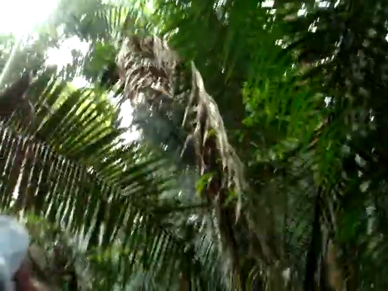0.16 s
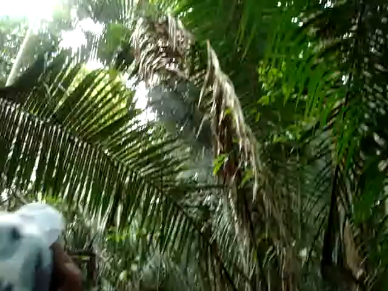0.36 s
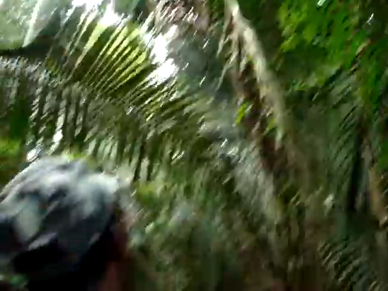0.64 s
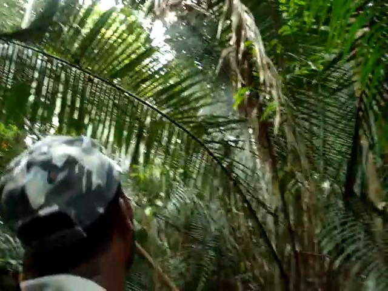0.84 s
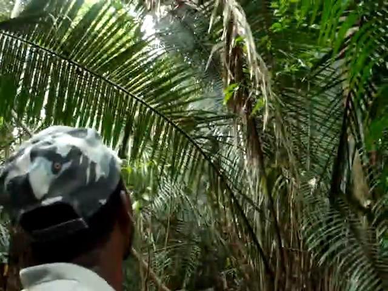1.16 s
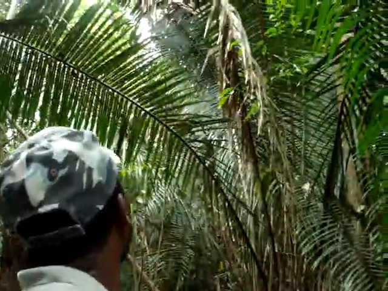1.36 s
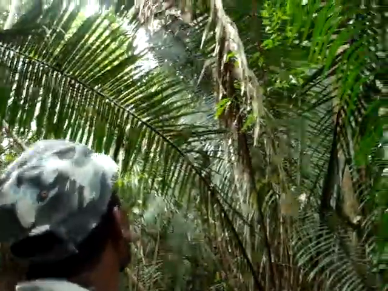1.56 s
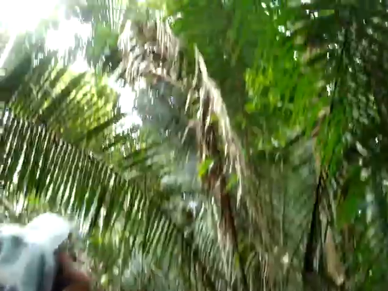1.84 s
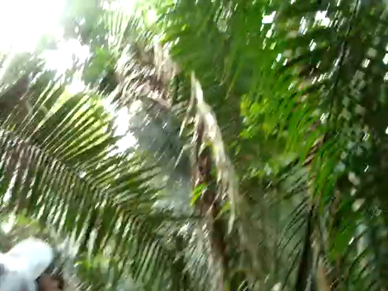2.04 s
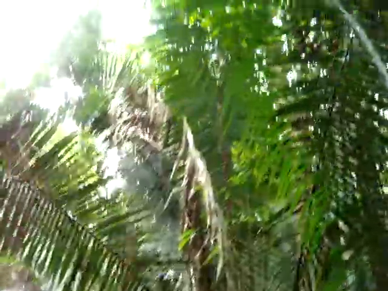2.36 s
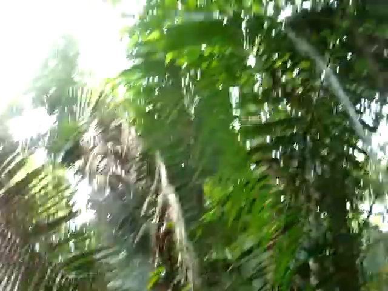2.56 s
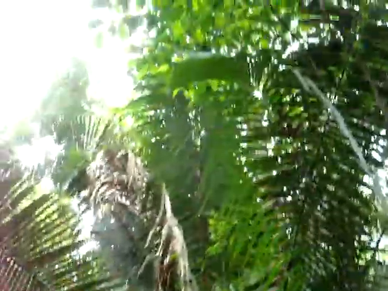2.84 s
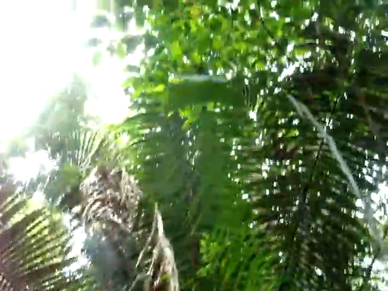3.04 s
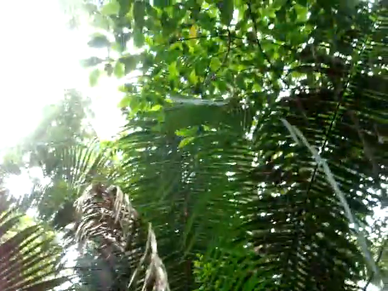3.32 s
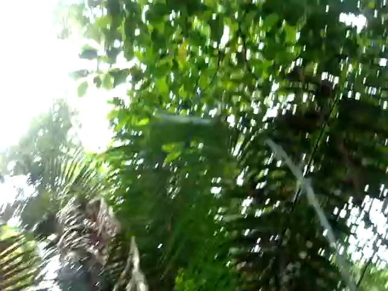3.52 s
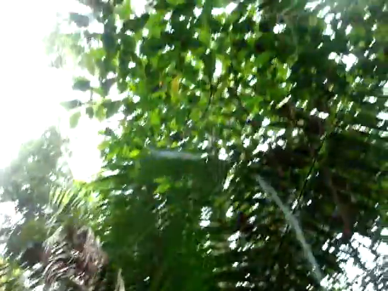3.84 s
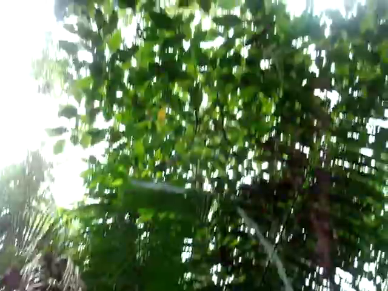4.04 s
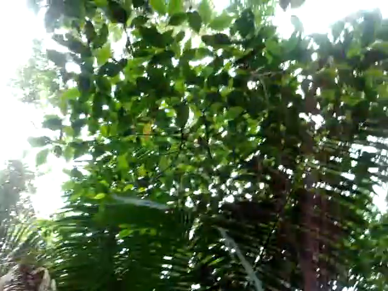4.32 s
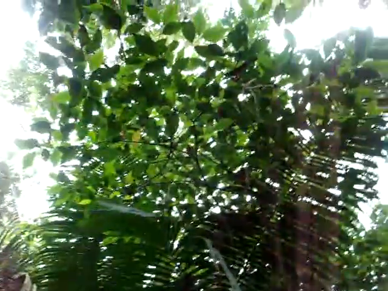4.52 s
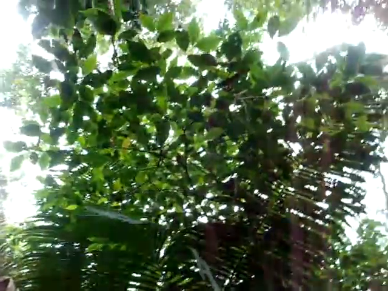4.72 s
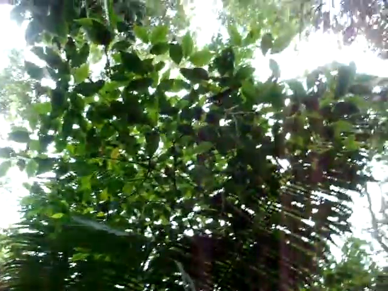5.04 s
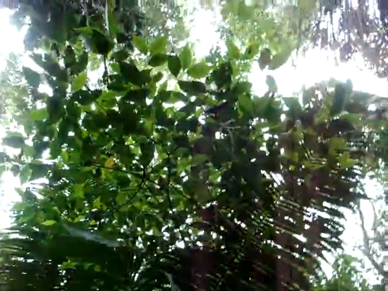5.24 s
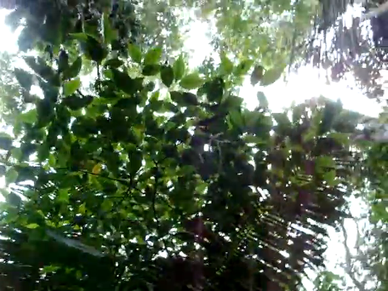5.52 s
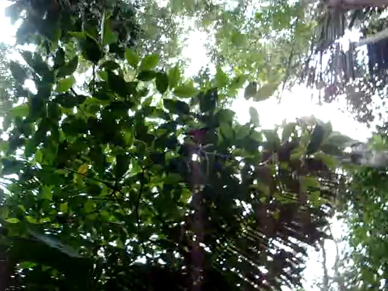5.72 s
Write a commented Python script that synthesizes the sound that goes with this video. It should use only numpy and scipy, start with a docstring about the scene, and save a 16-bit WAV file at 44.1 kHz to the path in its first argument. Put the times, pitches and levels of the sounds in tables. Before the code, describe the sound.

Howler monkeys in a jungle: quiet whistles and dry leaf snaps, then deep grunts, hooting and a swelling raspy roar with loud twig cracks.

```python
"""Howler monkeys in the canopy: a grunt dies away, a bird whistles and dry leaves crackle underfoot,
then grunts, indrawn moans and clear hoots build into a long hoarse roar, over forest hush and soft knocks.
Breath noise rings throat resonances for grunts and roar; hoots, moans and whistles are gliding tones.
Leaves are crackling noise with sharp snaps; sparse random taps give the forest's diffuse echo."""
import sys
import numpy as np
from scipy import signal
from scipy.fft import rfft, irfft
from scipy.io import wavfile

SR = 44100
rng = np.random.default_rng(int(sys.argv[2]) if len(sys.argv) > 2 else 0)


def gain_from_decibels(decibels):
    """Convert decibel values to linear amplitude factors."""
    exponent = np.asarray(decibels, float) / 20
    return 10 ** exponent


def unload_wav(signal):
    """Save mono or channel-first audio to the path in sys.argv[1] as 16-bit WAV at rate SR, clipped to [-1, 1]."""
    wavfile.write(
        sys.argv[1],
        SR,
        np.round(np.clip(np.atleast_2d(signal).T, -1, 1) * 32767).astype(np.int16),
    )


N = 259370


def evened(x):
    """Scales to rms 1."""
    return x / np.sqrt(np.mean(x ** 2) + 1e-20)


def add(mix, start_s, sound):
    """Mixes a sound in at start_s."""
    part = mix[round(start_s * SR):][:len(sound)]
    part += sound[:len(part)]


def layer(events):
    """Sums (start s, sound) events into one layer."""
    out = np.zeros(N)
    for start_s, sound in events:
        add(out, start_s, sound)
    return out


def columns(rows):
    """Reads a curve table at every sample; returns start time and columns."""
    times_s, *cols = np.transpose(rows)
    t = np.arange(times_s[0], times_s[-1], 1 / SR)
    return times_s[0], [np.interp(t, times_s, c) for c in cols]


def wander(count, rate_hz):
    """Slow random wobble of rms 1: lowpassed noise, settled over 4000 samples."""
    b, a = signal.butter(2, rate_hz, fs=SR)
    return evened(signal.lfilter(b, a, rng.standard_normal(count + 4000))[4000:])


def phase_of(hz):
    """Phase [rad] of a tone of varying frequency."""
    return 2 * np.pi * np.cumsum(hz) / SR


def coloured(points):
    """Noise with the given spectrum, rms 1; levels interpolate over log frequency."""
    hz = np.fft.rfftfreq(N, 1 / SR)
    f, db = np.transpose(points)
    gain = gain_from_decibels(np.interp(np.log(hz + 1), np.log(f + 1), db))
    return evened(irfft(rfft(rng.standard_normal(N)) * gain, N))


def resonate(x, hz, width_hz):
    """Resonance: shifts hz down to zero, smooths twice for steep skirts, shifts back."""
    turn = np.exp(1j * phase_of(hz * np.ones(len(x))))
    r = np.exp(-np.pi * width_hz / SR)
    low = signal.lfilter([1 - r], [1, -r], x / turn)
    low = signal.lfilter([1 - r], [1, -r], low)
    return 2 * (turn * low).real


def through(x, modes, shift=1, waver_db=0):
    """Sum of resonances of alternating sign, each wavering in level and drifting on its own; rms 1."""
    total = 0
    for k, (hz, width_hz, db) in enumerate(modes):
        gain = (-1) ** k * gain_from_decibels(db + waver_db * wander(len(x), 4.2))
        drifting_hz = hz * shift * (1 + .004 * wander(len(x), 3))
        total = total + gain * resonate(x, drifting_hz, width_hz)
    return evened(total)


def roar(effort_db, throat, upper_db, lowest_db, shift=1):
    """Lumpy breath noise, for chaotically flapping folds, rings low, middle and upper throat chambers."""
    breath = rng.standard_normal(len(effort_db)) * gain_from_decibels(1.5 * wander(len(effort_db), 70))
    low, middle, high = (through(breath, modes, by, waver_db=1.2)
                         for modes, by in zip(throat, (1, 1, shift)))
    # air rushing past the teeth
    hiss = evened(signal.lfilter(*signal.butter(2, 4400, "high", fs=SR), breath))
    # the lowest chambers weaken against the middle as effort grows; lowest_db holds at -20 dB
    low_gain = gain_from_decibels(lowest_db - .25 * (effort_db + 20))
    return gain_from_decibels(effort_db) * (middle + gain_from_decibels(upper_db) * high + low_gain * low + gain_from_decibels(-27) * hiss)


def grunt(start_s, effort_db, rise_s, hold_s, fall_s, upper_db):
    """One push of breath: a swelling rise, a hold, a fall and a weak trail."""
    # chambers, low, middle and upper group: (centre [Hz], width [Hz], relative level [dB])
    chambers = ([(341, 100, -7), (491.7, 58.5, 1.5)], [(699, 211, -4), (1165, 253, -4), (1628, 295, -7),
                (2040, 470, -14.5), (2436, 83, -15.5), (2644, 156, -18.5)], [(3210, 194, 8.5),
                (3670, 480, -6.5), (4280, 430, -5), (4880, 480, -13), (5420, 200, -12)])
    t = np.arange(0, .7, 1 / SR)
    after_s = np.maximum(t - rise_s - hold_s, 0)
    rise_db = 36 * np.log10(np.clip(t / rise_s, .01, 1))
    trail_db = -12.5 - 49 * after_s
    fall_db = np.maximum(-20 * after_s / fall_s, trail_db)
    shape_db = rise_db + fall_db
    return start_s, roar(effort_db + shape_db, chambers, upper_db - .1 * shape_db, -11.5)


def grunts():
    """Short hoarse grunts, each one push of breath."""
    # (start [s], effort [dB], rise [s], hold [s], time to fall 20 dB [s],
    #  upper throat against middle at full push [dB])
    rows = [(0, -18.5, .004, .045, .11, -13.5), (2.384, -22.5, .066, .016, .065, -19.5),
            (2.964, -21.5, .072, .022, .125, -17.5), (3.218, -21, .072, .032, .165, -17.5),
            (3.412, -21, .178, .006, .125, -17.5), (3.852, -19.5, .058, .115, .075, -18.5)]
    return layer(grunt(*row) for row in rows)


def hush():
    """Forest hush: steady coloured noise."""
    # spectrum: (frequency [Hz], relative density [dB per Hz])
    spectrum = [(20, -31.5), (100, -19), (220, -8), (400, -4), (1300, -3.5), (2500, -12), (5000, -13),
                (10000, -24.5)]
    return gain_from_decibels(-48.5) * coloured(spectrum)


def rustle():
    """Leaf noise in tiny crackles of uneven size; each step stirs it up and it settles again."""
    # spectrum: (frequency [Hz], relative density [dB per Hz])
    spectrum = [(59, -49.5), (100, -30.5), (575, -19), (1110, -19), (1290, -11.5), (1890, -16.5),
                (2380, -9), (9890, -19.5), (12900, -50.5), (21800, -120)]
    # leaves trodden and brushed: (start [s], level [dB], rise [s], hold [s])
    steps = [(0.264, -40.5, 0.018, 0.013), (0.598, -44.5, 0.05, 0.065), (0.847, -44, 0.088, 0.21),
             (1.473, -42.5, 0.025, 0.084), (2.061, -42.5, 0.013, 0.012), (2.4, -52.5, 0.043, 0.078),
             (2.937, -41.5, 0.25, 0.057), (3.46, -46, 0.045, 0.54), (4.71, -39.5, 0.014, 0.0059),
             (4.83, -33, 0.011, 0.013)]
    rest_db, settle_db_per_s = -54, 71
    t, power = np.arange(N) / SR, gain_from_decibels(rest_db) ** 2
    for start_s, db, rise_s, hold_s in steps:
        settle_db = settle_db_per_s * np.maximum(t - start_s - rise_s - hold_s, 0)
        power = power + (np.clip((t - start_s) / rise_s, 0, 1) * gain_from_decibels(db - settle_db)) ** 2
    crackle = gain_from_decibels(2.4 * wander(N, 70))
    return np.sqrt(power) * evened(coloured(spectrum) * crackle)


def moan(start_s, length_s, first_hz, last_hz, level_db, mouth_db):
    """An unsteady low tone; noise puffs at the same jittery pitch ring the mouth."""
    # mouth resonances: (centre [Hz], width [Hz], relative level [dB])
    mouth = [(415, 39, 1), (638, 250, -4.5), (877, 106, 2.5), (1477, 144, 1), (1903, 89, -4),
             (2670, 260, -20.5), (3130, 51, -14.5)]
    t = np.arange(0, length_s, 1 / SR)
    hz = first_hz + (last_hz - first_hz) * t / length_s
    cycles = np.cumsum(hz * (1 + .012 * wander(len(hz), 40))) / SR
    tone = np.sqrt(2) * np.sin(2 * np.pi * cycles) * gain_from_decibels(3.1 * wander(len(hz), 44))
    puffs = (1.2 + np.exp(-(cycles % 1) / .84)) * rng.standard_normal(len(hz))
    voice = gain_from_decibels(level_db) * tone + gain_from_decibels(mouth_db) * through(puffs, mouth)
    rise_s, fall_s = .028, .035
    return start_s, voice * np.minimum(np.minimum(t / rise_s, (length_s - t) / fall_s), 1)


def moans():
    """Indrawn moans, one row a note."""
    # (start [s], length [s], first pitch [Hz], last pitch [Hz], fundamental [dB], mouth resonances [dB])
    rows = [(0.152, .2, 347.4, 317.4, -44.5, -46), (2.19, 0.094, 261, 246, -43.5, -43.5),
            (2.575, 0.19, 298.6, 335, -35, -33.5), (2.681, 0.12, 414, 396, -38.5, -28.5),
            (2.772, 0.15, 335, 349, -34, -37.5), (2.898, 0.071, 399, 411, -34.5, -43.5),
            (4.152, 0.21, 379.6, 370.4, -46, -48), (4.923, .26, 385, 348.7, -31, -38),
            (5.784, 0.11, 308, 327, -36, -39)]
    return layer(moan(*row) for row in rows)


def whistle(start_s, length_s, first_hz, last_hz, glide_s, level_db):
    """A near sine that glides to its note, swelling, then fades; a falling glide sets in gently."""
    t = np.arange(0, length_s, 1 / SR)
    u = np.minimum(t / glide_s, 1)
    bend = 2 if last_hz < first_hz else 1
    hz = first_hz + (last_hz - first_hz) * np.sin(np.pi / 2 * u) ** bend
    start_db, fade_db_per_s = -5, 110
    level_db = level_db + start_db * (1 - u) - fade_db_per_s * np.maximum(t - glide_s, 0)
    tone = np.sqrt(2) * np.sin(phase_of(hz))
    edges = signal.windows.tukey(len(hz), 700 / len(hz))
    return start_s, gain_from_decibels(level_db + 3.5 * wander(len(hz), 35)) * tone * edges


def whistles():
    """Bird, one row a whistle."""
    # (start [s], length [s], first pitch [Hz], last pitch [Hz], glide [s],
    #  relative level at the end of the glide [dB])
    rows = [(.17, .22, 3340, 3660, .1, -48.5), (.48, .14, 4100, 4200, .08, -49.5),
            (.75, .19, 2900, 3095, .06, -39.5), (.94, .24, 2030, 2765, .15, -40),
            (1.22, .24, 4180, 3500, .175, -38.5), (1.455, .08, 2500, 3700, .085, -43.5),
            (1.58, .15, 2650, 2262, .035, -43)]
    return layer(whistle(*row) for row in rows)


def snaps():
    """Dry leaves and twigs: each snap is a sharp crack and a burst of bright noise with a duller part."""
    # (start [s], relative level [dB], dull part relative level [dB], t60 of the slower half [s])
    rows = [(0.2714, -24.5, -4.5, 0.11), (0.633, -21, -9, 0.024), (0.6578, -33.5, -3, 0.05),
            (0.798, -37.5, 5.5, 0.043), (0.869, -25, -3.5, 0.062), (0.9397, -21, -20, 0.06),
            (1.116, -28.5, -23, 0.05), (1.4976, -38, -14, 0.051), (1.671, -36.5, 3, 0.032),
            (2.0718, -27.5, -17, 0.069), (2.5147, -28.5, -21, 0.17), (2.979, -34, 8, 0.033),
            (3.192, -26.5, 0, 0.12), (3.6492, -20.5, -7, 0.079), (4.5398, -24.5, -11, 0.092),
            (4.5815, -19, -10.5, 0.099), (4.6074, -25, -15.5, 0.063), (4.6592, -14, -2.5, 0.066),
            (4.7038, -16.5, -0.5, 0.25), (4.724, -14, 0, 0.064), (4.8326, -9, -9, 0.1),
            (4.9005, -15.5, -2, 0.12)]
    out, t = np.zeros(N), np.arange(6000) / SR
    for start_s, level_db, dull_db, t60_s in rows:
        noise = rng.standard_normal(len(t))
        bright = signal.lfilter(*signal.butter(1, [2800, 6500], "band", fs=SR), noise)
        dull = evened(signal.lfilter(*signal.butter(2, [350, 2200], "band", fs=SR), noise))
        crack = gain_from_decibels(-60 * t / .012)
        burst = gain_from_decibels(-60 * t / np.clip(t60_s, .015, .3))
        add(out, start_s, gain_from_decibels(level_db) * .5 * (crack + burst) * (bright + gain_from_decibels(dull_db) * dull))
    return out


def whine(start_s, length_s, first_hz, last_hz, level_db):
    """A narrow breathy tone that swells and fades."""
    hz = np.linspace(first_hz, last_hz, round(length_s * SR))
    tone = evened(resonate(rng.standard_normal(len(hz)), hz, 25))
    return start_s, gain_from_decibels(level_db) * tone * signal.windows.tukey(len(hz), .5)


def whines():
    """Thin wavering tones, perhaps other monkeys further off."""
    # (start [s], length [s], first pitch [Hz], last pitch [Hz], level at the height of the swell [dB])
    rows = [(0.635, 0.24, 1650, 1610, -57), (1.184, 0.24, 1380, 1324, -55), (4.085, 0.24, 2330, 2270, -41),
            (4.146, 0.44, 1633, 1640, -37), (4.358, 0.35, 2090, 2060, -46)]
    return layer(whine(*row) for row in rows)


def knocks():
    """Hand on the microphone housing: soft low pushes that swing back and die out."""
    # (time [s], relative strength [dB]); each push sets in 4 ms ahead
    rows = [(2.998, -33), (3.967, -22), (4.718, -25), (4.838, -37), (4.898, -25), (5.068, -31),
            (5.119, -30), (5.3, -35), (5.848, -29)]
    u = np.arange(3000) / SR / .0015
    push = u * (1 - u / 2) * np.exp(-u)
    return layer((s - .004, gain_from_decibels(strength_db) * push) for s, strength_db in rows)


def hoot(rows, rough, overtone_ends_db):
    """A clear tone with uneven overtones, blended with breath ringing the same chamber."""
    # multiples 2-7 of a clear hoot: relative level [dB]
    partials_db = [0.5, 0.5, -7, -10.5, -12, -35]
    start_s, (hz, level_db) = columns(rows)
    count = len(hz)
    # the second partial falls as the hoot's level rises
    overtone_db = np.linspace(*overtone_ends_db, count) - .53 * (level_db - level_db.max())
    phase = phase_of(hz * (1 + .009 * wander(count, 60)))
    # the higher partials come up only when the hoot is loud, clear and low
    lift_db = .2 * (level_db + 11) - .06 * (hz - 690) - 8 * rough
    overtones = 0
    for k, db in enumerate(partials_db):
        gain = gain_from_decibels(db + k * lift_db + 3 * wander(count, 25))
        overtones = overtones + gain * np.sin((k + 2) * phase)
    breathy = evened(resonate(rng.standard_normal(count), hz, 50.6))
    clear = np.sqrt(2 - 2 * rough)
    first = clear * np.sin(phase) + np.sqrt(rough) * breathy
    voice = gain_from_decibels(level_db) * first + gain_from_decibels(overtone_db) * clear * overtones
    return start_s, voice * signal.windows.tukey(count, 600 / count)


def hoots():
    """Clear hoots, folds locking to the hyoid chamber."""
    # one curve a hoot: (time [s], pitch [Hz], level [dB])
    curves = [
        [(3.455, 718, -23), (3.485, 719, -19.5), (3.53, 715.7, -13.5), (3.58, 738, -17), (3.63, 730, -24)],
        [(3.645, 708.5, -21.5), (3.665, 702.7, -15.5), (3.69, 680, -12), (3.73, 677, -10.5), (3.768, 688, -13),
         (3.783, 704, -24.5), (3.803, 734, -12.5), (3.82, 730, -21.5)],
        [(3.84, 723.4, -25), (3.87, 754, -20.5), (3.9, 760, -29), (3.935, 728, -18)],
        [(3.94, 733.6, -25), (3.96, 738.4, -11.5), (3.978, 734, -13.5), (3.99, 735, -12), (4.02, 750, -20),
         (4.05, 724, -29.5)],
    ]
    # breathy share of the power at the fundamental, one a hoot [0-1]
    rough = [.2, .06, .6, .25]
    # overtones where the hoot is at its loudest: (relative level at start [dB], at end [dB])
    overtone_ends_db = [(-31, -35), (-30, -31.5), (-30.5, -34), (-29.5, -42)]
    return layer(hoot(*call) for call in zip(curves, rough, overtone_ends_db))


def hyoid(level_db):
    """Breath rings the hollow throat bone: a fluttering tone within a narrow band of noise."""
    count = len(level_db)
    hz = 750 * (1 + .006 * wander(count, 6))
    ring = evened(resonate(rng.standard_normal(count), hz, 50))
    tone = np.sqrt(2) * np.sin(phase_of(hz * (1 + .014 * wander(count, 30))))
    # loose folds slap about 33 times a second, never quite in step, harder when loud
    depth = .5 * gain_from_decibels(.5 * (level_db - level_db.max()))
    flutter = 1 + depth * np.sin(phase_of(33 * (1 + .3 * wander(count, 12))))
    return gain_from_decibels(level_db) * (.4 * ring + .85 * tone * flutter)


def long_roar():
    """Long hoarse roar with hyoid ring; late on the upper throat shortens and its bands climb."""
    # (time [s], breath effort [dB], hyoid ring [dB], upper throat against middle [dB])
    curve = [(4.0, -31, -32, -12), (4.15, -36.5, -31, -11.5), (4.3, -33.5, -26.5, -25),
             (4.42, -31.5, -30.5, -24), (4.73, -27, -31, -17), (4.79, -23, -26, -32), (4.9, -21, -25, -24),
             (4.97, -21.5, -16.5, -19.5), (5.1, -17, -17, -15), (5.56, -20, -18, -14.5),
             (5.61, -22, -22.5, -15.5), (5.88, -16, -22, -17)]
    # chambers, low, middle and upper group: (centre [Hz], width [Hz], relative level [dB])
    chambers = ([(342, 45, -7.5), (512.6, 104, 2.5)], [(771, 285, -3), (1010, 140, -7.5), (1174, 149, 0.5),
                (1510, 247, -3.5), (1662, 51, 1.5), (1770, 290, -8.5), (2111.5, 180, -5), (2246, 49, -4),
                (2391, 154, -6)], [(3142, 256, 6), (3532, 140, 0), (3880, 660, -7.5), (4746, 270, -9),
                (6270, 230, -10.5), (6800, 560, -10.5)])
    start_s, (effort_db, hyoid_db, upper_db) = columns(curve)
    t = start_s + np.arange(len(effort_db)) / SR
    shorten_from_s, shorten_per_s = 5.56, .12
    shift = 1 + shorten_per_s * np.maximum(t - shorten_from_s, 0)
    voice = roar(effort_db, chambers, upper_db, -14.5, shift)
    return layer([(start_s, voice + hyoid(hyoid_db))])


def forest(x, t60_s):
    """Diffuse echoes from trunks and leaves: sparse taps of random sign dying away."""
    taps = np.zeros(SR)
    at = np.arange(400, SR - 20, 20) + rng.integers(0, 20, (SR - 401) // 20)
    taps[at] = rng.choice([-1., 1.], len(at)) * gain_from_decibels(-60 * at / SR / t60_s)
    return signal.fftconvolve(x, taps / np.linalg.norm(taps))[:N]


def scene():
    """Monkeys and bird up in the trees with echo; leaves and knocks close by."""
    monkeys = grunts() + moans() + whines() + hoots() + long_roar()
    # small bodies radiate little bass
    monkeys = signal.lfilter(*signal.butter(2, 210, "high", fs=SR), monkeys)
    bird = whistles()
    far = monkeys + gain_from_decibels(-11) * forest(monkeys, .6)
    far += gain_from_decibels(-4) * bird + gain_from_decibels(-2) * forest(bird, .68)
    return (far + hush() + rustle() + snaps() + knocks())[None]


def top_cut(x):
    """Nothing passes above the cut-off."""
    return signal.sosfilt(signal.butter(12, 10040, fs=SR, output="sos"), x)


def record(dry):
    """Steep lowpass at 9960 Hz on the finished mix."""
    lowpass = signal.firwin(801, 9960, window=("kaiser", 9), fs=SR)
    limited = signal.oaconvolve(dry, lowpass[None], "same")
    return top_cut(limited)


dry = scene()
out = record(dry)
unload_wav(out)
```